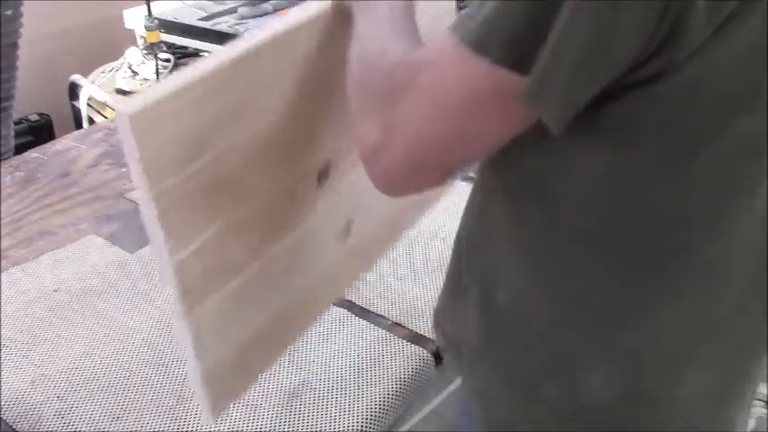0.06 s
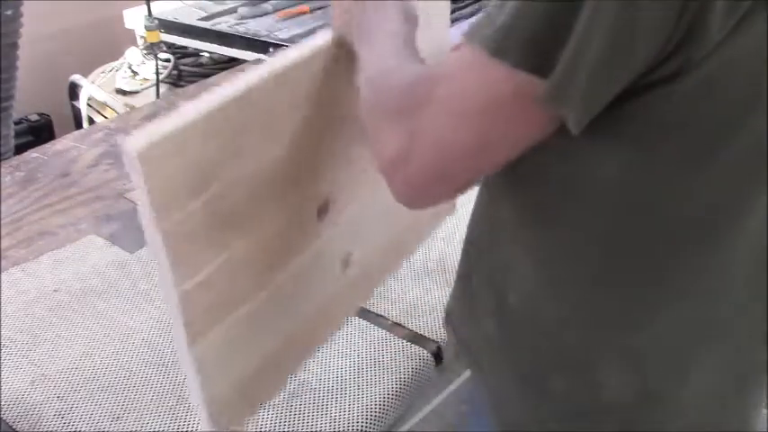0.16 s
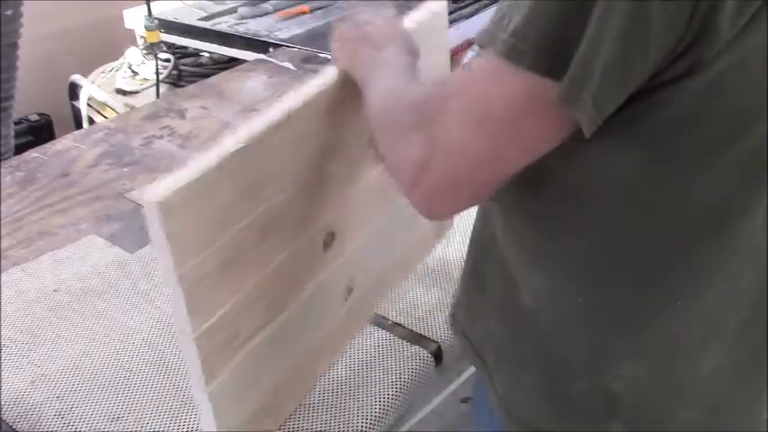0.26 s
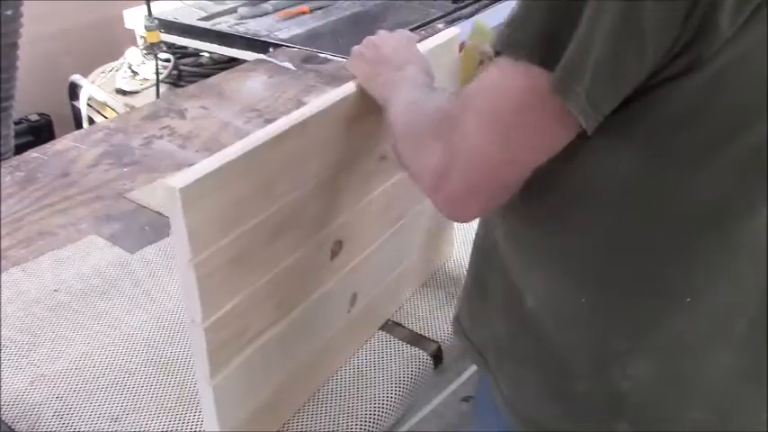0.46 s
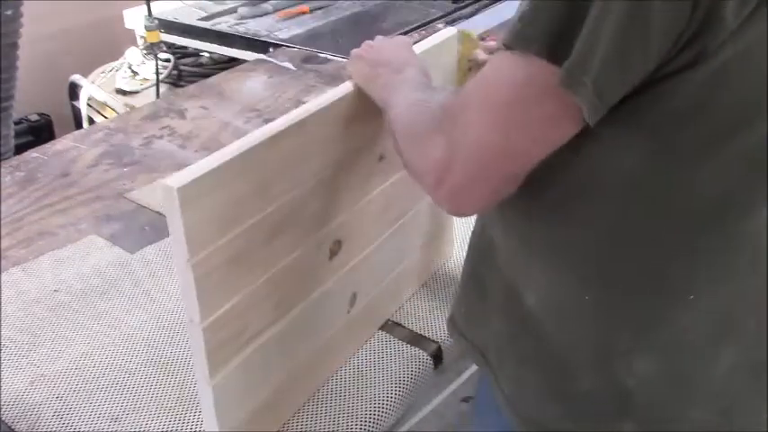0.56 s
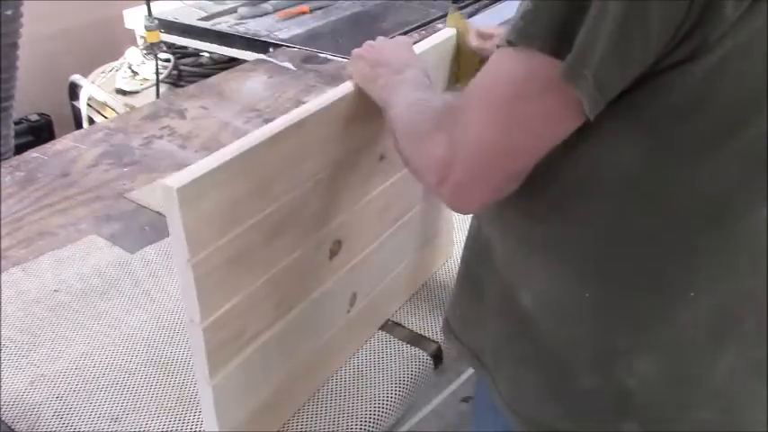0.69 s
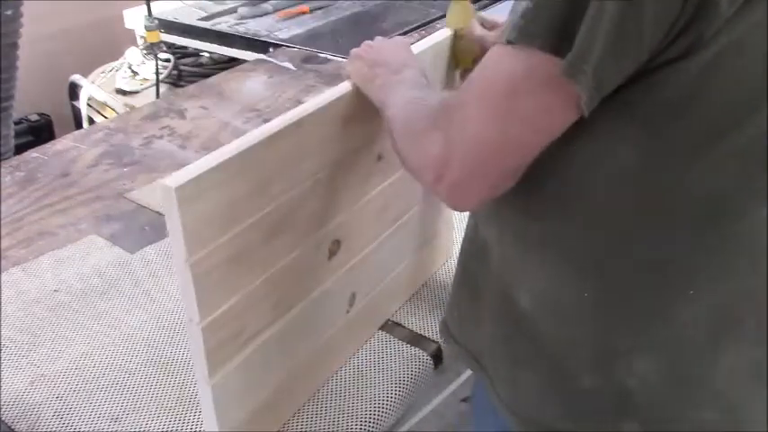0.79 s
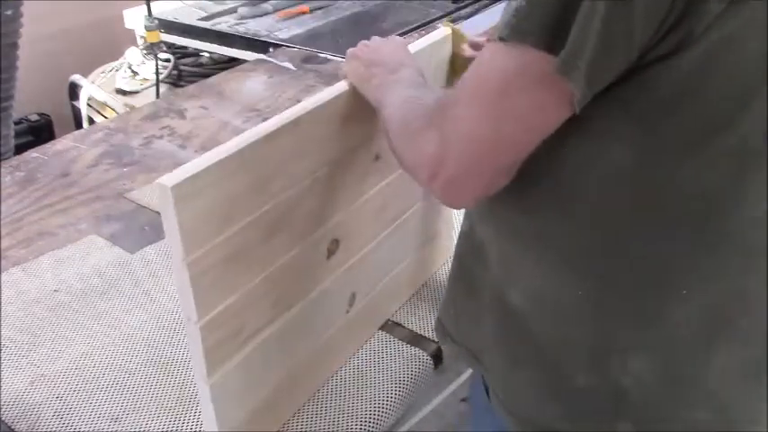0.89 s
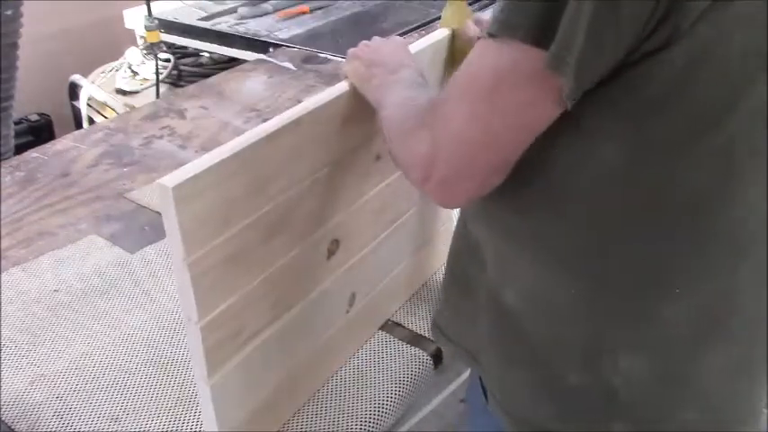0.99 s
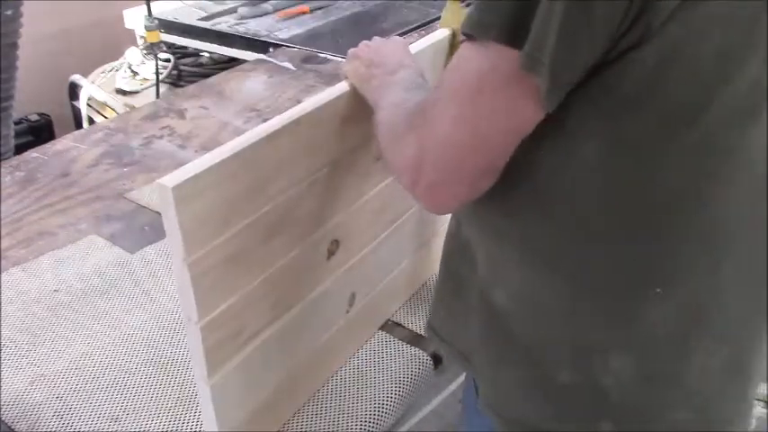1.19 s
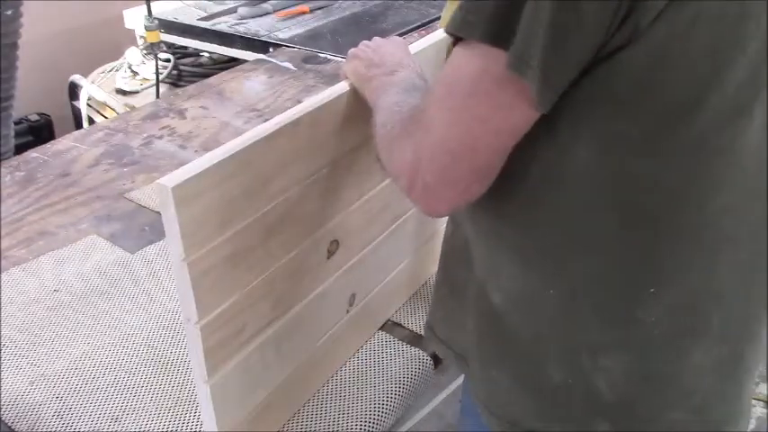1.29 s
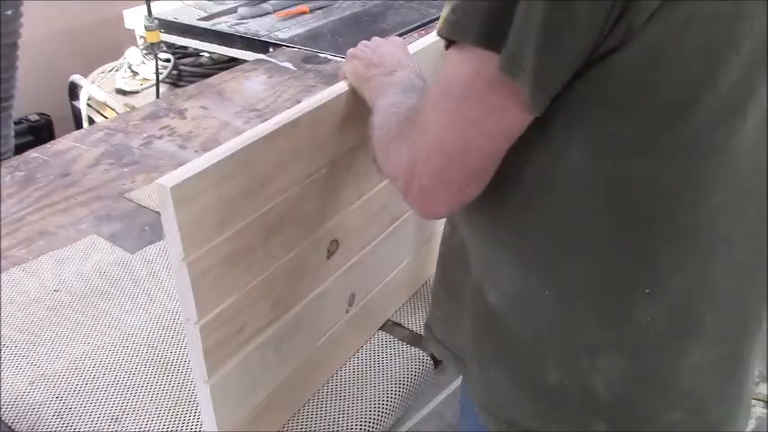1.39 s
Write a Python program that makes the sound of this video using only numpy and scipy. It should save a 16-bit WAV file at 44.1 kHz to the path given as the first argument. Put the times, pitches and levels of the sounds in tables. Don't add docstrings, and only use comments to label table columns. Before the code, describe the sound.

Sandpaper rasps along a wooden panel's edge in seven quick strokes, after the panel lands on a bench with a loud low knock and a small metallic chatter; close stereo microphone in a hissy, lightly echoing workshop.

```python
import sys
import numpy as np
from scipy import signal
from scipy.fft import rfft, irfft, next_fast_len
from scipy.io import wavfile
from scipy.ndimage import uniform_filter1d, map_coordinates

SR = 44100
rng = np.random.default_rng(int(sys.argv[2]) if len(sys.argv) > 2 else 0)


def linear_from_db(decibels):
    return 10 ** (np.asarray(decibels, float) / 20)


def output_pcm(signal):
    pcm = np.clip(np.atleast_2d(signal).T, -1, 1) * 32767
    wavfile.write(sys.argv[1], SR, np.round(pcm).astype(np.int16))


N = 63945
T = np.arange(N) / SR

# frequency in Hz, density in dB per Hz.
AIR_SPECTRUM = [(15, -74), (25, -22), (119, -5.5), (152, -5), (615, -12), (896, -14.5), (4620, -26),
                (6740, -25.5), (15500, -37)]
# frequency in Hz, correlation from -1 to 1.
AIR_ALIKE = [(60, 0.22), (240, -0.2), (950, -0.58), (3800, 0.39), (9000, 0.39), (15000, -0.28)]
# frequency in Hz, level in dB.
FAN_HUM = [(102.3, -95), (123.8, -66)]
# frequency in Hz, decay time t60 in s.
WALL_T60 = [(100, 0.25), (1000, 0.57), (4000, 0.65), (12000, 0.19)]
# frequency in Hz, correlation from -1 to 1.
WALL_ALIKE = [(100, 1), (1000, 0.8), (5000, .3), (14000, 0.97)]
# frequency in Hz, correlation from -1 to 1.
SAND_ALIKE = [(300, .4), (900, 0.91), (1500, 0.98), (3500, 0.72), (5000, 0.36), (7000, 0.24), (10000, 0.33),
              (14000, 0.57)]
# frequency in Hz, gain in dB.
MIC_RESPONSE = [(30, -12), (60, -0.5), (13000, 1), (15000, -4), (15650, -10)]

# start in seconds, level in dB.
TOOL_TOUCHES = [(.245, -38.5), (0.2484, -28), (.262, -25.5), (0.2639, -24), (0.271, -29), (0.288, -33),
                (0.309, -36), (.317, -38.5), (0.346, -48), (0.354, -45), (0.364, -42)]
# frequency in Hz, level in dB, decay time t60 in s.
TOOL_MODES = [(2003, -11, 0.043), (2551, -8.5, 0.031), (2550, -8, 0.051), (2710, -8, 0.033),
              (4613, -12.5, 0.025), (5300, -11.5, 0.0075), (3390, -10.5, 0.011)]

# start in seconds, force in dB.
DOOR_BLOWS = [
    (.232, 2.27),
    (0.289, -14.5),
    (.309, -5.5),
    (.336, -12),
    (.398, -17),
]
# frequency in Hz, level in dB, decay time t60 in s.
DOOR_MODES = [(127.5, -23.5, 0.32), (151, -16.5, 0.088), (162.2, -20, 0.28), (211, -9, 0.14),
              (220.9, -16.5, 0.29), (376, -16.5, 0.099), (588, -27, 0.13), (649, -33.5, 0.15),
              (748.5, -40.5, 0.1)]
# frequency in Hz, level in dB, decay time t60 in s.
BENCH_MODES = [(156, -23, 0.28), (176.9, -32, 0.74), (201.4, -9.5, 0.35), (240.1, -20.5, 1),
               (259.8, -20.5, 0.56), (269.3, -23.5, 0.79), (327, -34.5, 1), (372.7, -34, 0.93),
               (440, -23, 0.34), (500, -21.5, 0.27), (525, -45, 0.26)]
# frequency in Hz, level in dB, decay time t60 in s.
FLOOR_MODES = [(69.75, -33.5, 1.01), (86.4, -37.5, 1.26), (123, -35, 0.81)]
# start in seconds, rise in s, then modes with frequency in Hz, level in dB, t60 in s.
LAST_ROCK = (0.457, 0.014, [(229.5, -16.5, 0.1), (243, -34, 0.065)])
# frequency in Hz, density in dB per Hz.
SHUDDER_SPECTRUM = [(40, -27), (100, -26.5), (230, -9.5), (450, -14), (900, -27), (2200, -36.5),
                    (5000, -46.5), (14000, -66.5)]
# frequency in Hz, decay time t60 in s.
SHUDDER_T60 = [(60, 1), (250, 0.88), (600, 0.6), (1500, 0.66), (8000, 0.53)]
# start in seconds,
# length in s, level in dB, # centre in Hz, width in Hz.
CRUNCHES = [
    (0.23, 0.0064, -56, 7000, 8950),
    (0.236, 0.0092, -39, 1130, 500),
    (0.237, 0.042, -60, 7950, 8900),
    (0.264, .005, -44, 5300, 1200),
]

# start in seconds, length in s, level in dB,
# centre in Hz, width in Hz.
PAPER_SLIDES = [
    (0.1933, 0.03, -54, 780, 100),
    (0.473, 0.18, -57.5, 1560, 20),
    (0.557, .075, -52.5, 1590, 75),
    (1, 0.034, -46.5, 1400, 49),
    (0.507, 0.11, -59, 820, 94),
    (0.094, 0.25, -62, 1600, 1800),
]
# start in seconds, length in s, level in dB, wood tone in dB,
# lean of the pressure from -1 to 1.
STROKES = [
    (0.578, 0.17, -46, 0.5, 0.41),
    (0.761, 0.099, -43.5, 0, -0.14),
    (0.855, .14, -43, -3, 0.27),
    (1.004, 0.097, -43.5, 3, 0.21),
    (1.102, 0.11, -44.5, 3.5, 0.033),
    (1.233, 0.087, -42.5, 3, 0.24),
    (1.325, .13, -44, 2, 0.01),
]
# frequency in Hz, density in dB per Hz.
RASP_SPECTRUM = [(150, -12), (400, -20), (800, -11), (1150, -12.5), (1500, -8.5), (3500, -6), (10000, -18),
                 (15500, -53)]
# frequency in Hz, density in dB per Hz.
FIZZ_SPECTRUM = [(2350, -59), (4000, -10), (5590, -7), (6860, -5.5), (11000, -4.5), (14300, -14),
                 (15500, -17)]
# frequency in Hz, width in Hz, level in dB.
NEAR_END = [(1330, 56, -4), (1446, 82, -3.5), (1604, 108, -1), (1702, 83, -1), (1815, 73, -2),
            (1960, 120, -9), (2200, 170, -10)]
# frequency in Hz, width in Hz, level in dB.
FAR_END = [(2563, 58, -0.5), (2910, 72, -1.5), (3180, 70, 2), (3292, 78, -1.5), (3545, 39, 6.5),
           (3824, 53, -9), (4610, 88, -11), (6970, 750, -8.5)]
# frequency in Hz, width in Hz, level in dB.
PANEL = [(290.7, 15.2, 2.5), (776, 55, -0.5), (916, 39, -4.5), (713, 13, -13), (423, 27, -11)]

ROUND = 0.64
CLUMP_DB = 1.2
PLACE_DB = 11


def unit(x):
    return x / np.sqrt(np.mean(x ** 2) + 1e-20)


def along(points, hz):
    f, v = np.transpose(points)
    return np.interp(np.log(hz + 1), np.log(f + 1), v)


def filtered(x, response):
    m = next_fast_len(N + SR)
    return irfft(rfft(x, m) * response(np.fft.rfftfreq(m, 1 / SR)), m)[..., :N]


def resonances(rows):
    def response(f):
        return sum((-1) ** k * linear_from_db(db) * 1j * f * width / (centre * centre - f * f + 1j * f * width)
                   for k, (centre, width, db) in enumerate(rows))
    return response


def wobble(rate):
    return map_coordinates(rng.standard_normal(2000), [T * rate])


def pair(alike, spectrum=((1, 0),)):
    def mid_side_gains(hz):
        turn = np.arccos(np.clip(along(alike, hz), -1, 1)) / 2
        return linear_from_db(along(spectrum, hz)) * [np.cos(turn), np.sin(turn)]
    mid, side = filtered(rng.standard_normal((2, N)), mid_side_gains)
    return unit(np.array([mid + side, mid - side]))


def dying(noise, t60s):
    hz, t, z = signal.stft(noise, SR, nperseg=256)
    decay = linear_from_db(-60 * t / along(t60s, hz)[:, None])
    return signal.istft(z * decay, SR, nperseg=256)[1][..., :N]


def ring(modes, start, rise):
    t = np.clip(T - start, 0, None)
    vibration = sum(linear_from_db(db - 60 * t / t60) * np.sin(2 * np.pi * hz * t) for hz, db, t60 in modes)
    return (1 - np.exp(-(t / rise) ** 1.58)) * vibration


def speed(start, length, lean):
    u = np.clip((T - start) / length, 0, 1)
    return np.abs(np.sin(np.pi * u ** np.exp(lean)))


def grits():
    tears = rng.standard_normal(N) * (rng.random(N) < 8300 / SR)
    tears = tears * linear_from_db(0.5 * rng.standard_normal(N))
    return unit(tears + 0.82 * rng.standard_normal(N))


def coloured_grits(spectrum):
    return unit(filtered(grits(), lambda hz: linear_from_db(along(spectrum, hz))))


def resonant_grits(centre, width):
    return unit(filtered(grits(), resonances([(centre, width, 0)])))


def air():
    hum = sum(linear_from_db(db + 2.5 + 1.7 * wobble(5.9)) * np.sin(2 * np.pi * hz * T + 0.53 * wobble(9))
              for hz, db in FAN_HUM)
    hiss_db = -55.5 - 3.5 + 0.72 * wobble(2.1)
    return linear_from_db(hiss_db) * pair(AIR_ALIKE, AIR_SPECTRUM) + hum


def room(x, alike):
    tail = dying(pair(alike), WALL_T60)
    tail = tail / np.sqrt(np.sum(tail ** 2) / 2)
    return signal.fftconvolve(np.pad(x, (250, 0))[None], tail, axes=1)[:, :N]


def rattle():
    rings, clicks = np.zeros(N), np.zeros(N)
    t = T[:SR // 5]
    click_db, click_t60_s, click_hz = -8, 0.006, 4500
    for start, db in TOOL_TOUCHES:
        at = round(start * SR)
        modes = sum(linear_from_db(level + rng.standard_normal() - 60 * t / t60) * np.sin(2 * np.pi * hz * t)
                    for hz, level, t60 in TOOL_MODES)
        rings[at:][:len(t)] += linear_from_db(db) * modes * (1 - np.exp(-t / 0.00045))
        click = linear_from_db(db + click_db - 60 * t / click_t60_s) * rng.standard_normal(len(t))
        clicks[at:][:len(t)] += click
    return rings + filtered(clicks, lambda hz: 1 / (1 + 1j * hz / click_hz) ** 3)


def shudder():
    noise = unit(filtered(rng.standard_normal(N), lambda hz: linear_from_db(along(SHUDDER_SPECTRUM, hz))))
    return dying(noise, SHUDDER_T60) * linear_from_db(-22) * (1 - np.exp(-T / 0.02))


def crunch():
    return sum(linear_from_db(db) * speed(start, length, -0.3) * resonant_grits(hz, width)
               for start, length, db, hz, width in CRUNCHES)


def knock():
    first = DOOR_BLOWS[0][0]
    bench_rise_s = 0.028
    door = sum(linear_from_db(db) * ring(DOOR_MODES, start, 0.0055) for start, db in DOOR_BLOWS)
    shaking = np.pad(shudder(), (round(first * SR), 0))[:N]
    settle_s, settle_takes_s, settle_db = 0.41, 0.022, -17.5
    damping = linear_from_db(settle_db * np.clip((T - settle_s) / settle_takes_s, 0, 1))
    top = ring(BENCH_MODES, first, bench_rise_s) * damping
    floorboards = ring(FLOOR_MODES, first, bench_rise_s)
    rock_s, rock_rise_s, rock_modes = LAST_ROCK
    last_rock = ring(rock_modes, rock_s, rock_rise_s)
    return door + top + last_rock + floorboards + crunch() + shaking


def slides():
    return sum(linear_from_db(db + 1.3 * wobble(58)) * speed(start, length, 0.14) * resonant_grits(hz, width)
               for start, length, db, hz, width in PAPER_SLIDES)


def rung(drive, rows):
    response = resonances(rows)
    return filtered(drive * grits(), response) / np.std(filtered(grits(), response))


def sanding():
    press_s, press_takes_s, press_db = 0.563, 0.088, -3
    press = linear_from_db(press_db * np.clip(1 - (T - press_s) / press_takes_s, 0, 1))
    rasp, fizz, tone = np.zeros((3, N))
    for start, length, db, tone_db, lean in STROKES:
        hand = speed(start, length, lean)
        rasp += linear_from_db(db) * hand ** ROUND * press
        fizz += linear_from_db(db - 2) * hand ** (ROUND * 1.78) * press
        tone += linear_from_db(db + tone_db) * speed(start, length, lean - 0.085) ** ROUND * press
    broad = rasp * linear_from_db(-2) * coloured_grits(RASP_SPECTRUM)
    fine = fizz * linear_from_db(CLUMP_DB * wobble(61.44)) * coloured_grits([(2500, -27.5)] + FIZZ_SPECTRUM)

    turns = [row[0] for row in STROKES] + [STROKES[-1][0] + STROKES[-1][1]]
    place = np.interp(T, turns, -(-1.) ** np.arange(len(turns))) / 2
    near_db = -5.5 + PLACE_DB * place + CLUMP_DB * wobble(70)
    near = rung(tone * linear_from_db(near_db), NEAR_END)
    far_db = -5 + 4 * (T - 1) - 0.6 * PLACE_DB * place + CLUMP_DB * wobble(70.74)
    far = rung(rasp * linear_from_db(far_db), FAR_END)
    panel_db = -12.5 + 1 * (T - 1)
    panel_drive = uniform_filter1d(tone, size=round(0.078 * SR))
    panel = rung(panel_drive * linear_from_db(panel_db), PANEL)
    return broad + fine + near + far + panel


def scene():
    sand = sanding() + slides()
    boom, tool = knock(), rattle()
    sand_echo = room(linear_from_db(-6.5) * sand, SAND_ALIKE)
    knock_echo = room(linear_from_db(-13) * boom + linear_from_db(-7.5) * tool, WALL_ALIKE)
    side = np.array([[1], [-1]])
    direct = sand * linear_from_db(0.3 * side) + boom + tool * linear_from_db(3.7 * side)
    return direct + sand_echo + knock_echo + air()


def top_cut(x):
    return signal.sosfilt(signal.butter(12, 15670, fs=SR, output="sos"), x)


def record(dry):
    mix = filtered(dry, lambda hz: linear_from_db(along(MIC_RESPONSE, hz)) * (hz < 15720))
    return top_cut(mix)


dry = scene()
out = record(dry)
output_pcm(out)
```